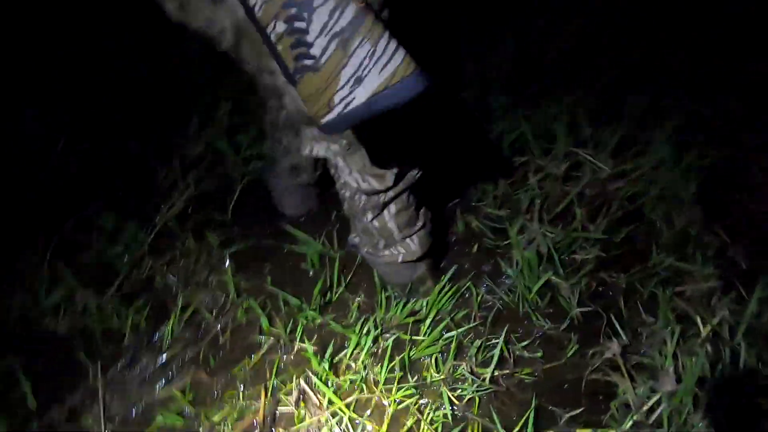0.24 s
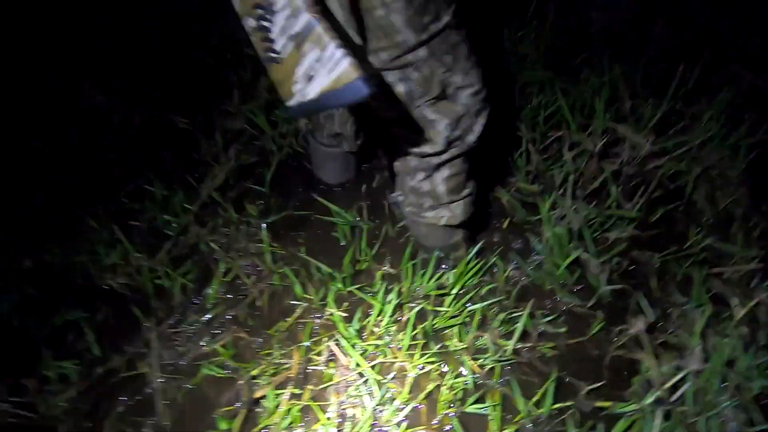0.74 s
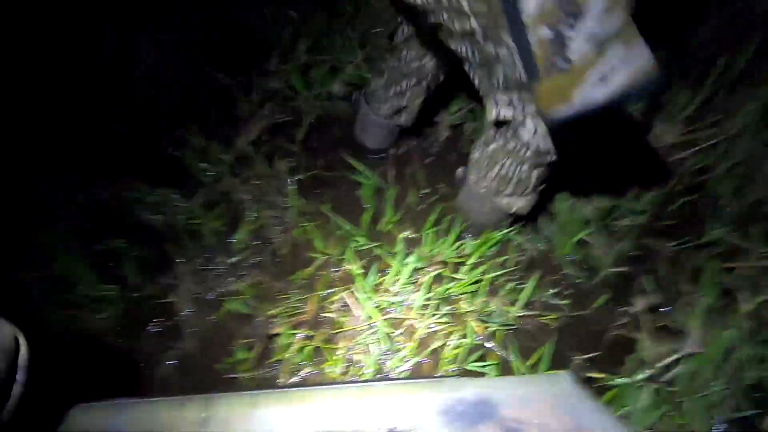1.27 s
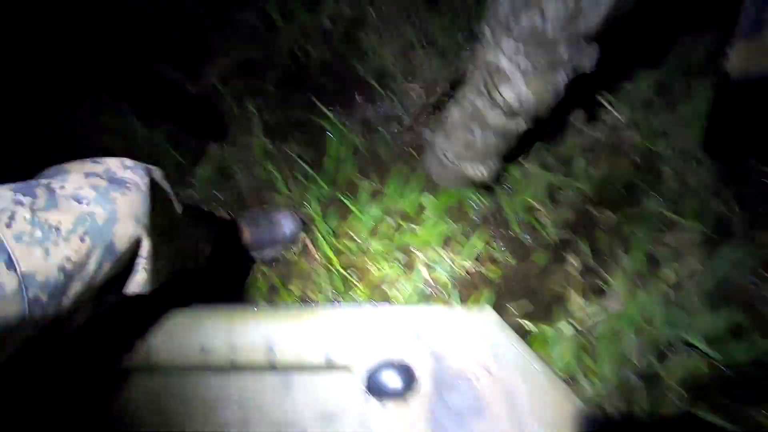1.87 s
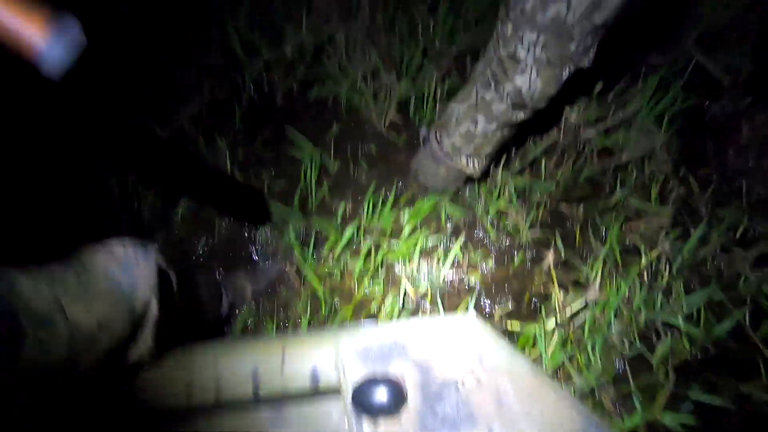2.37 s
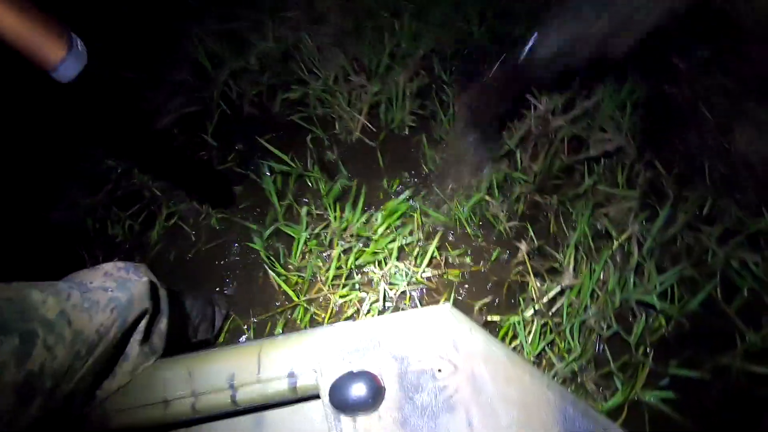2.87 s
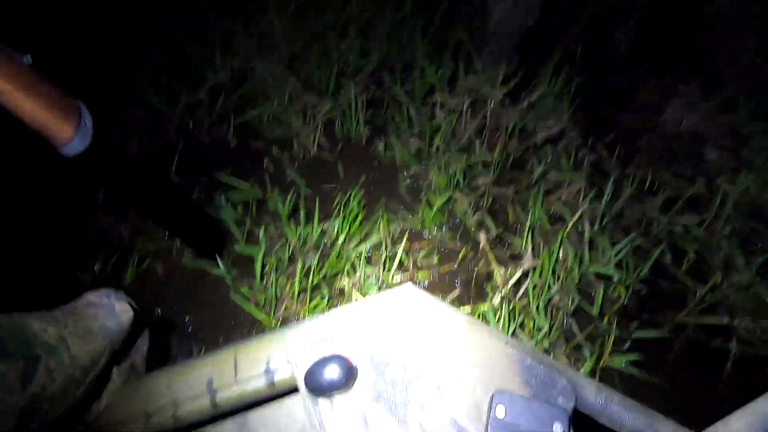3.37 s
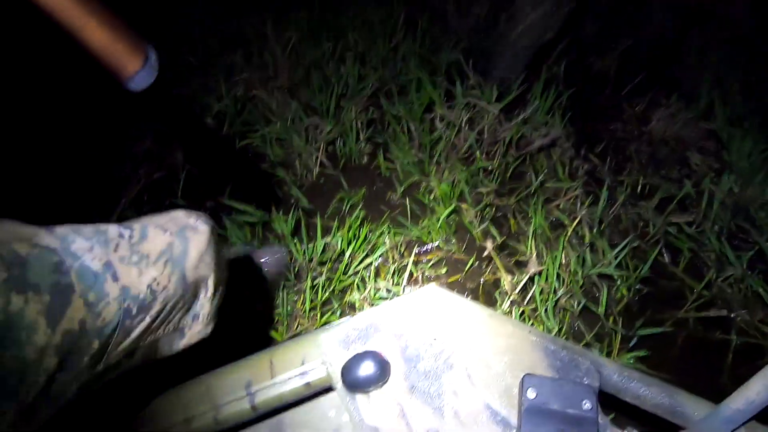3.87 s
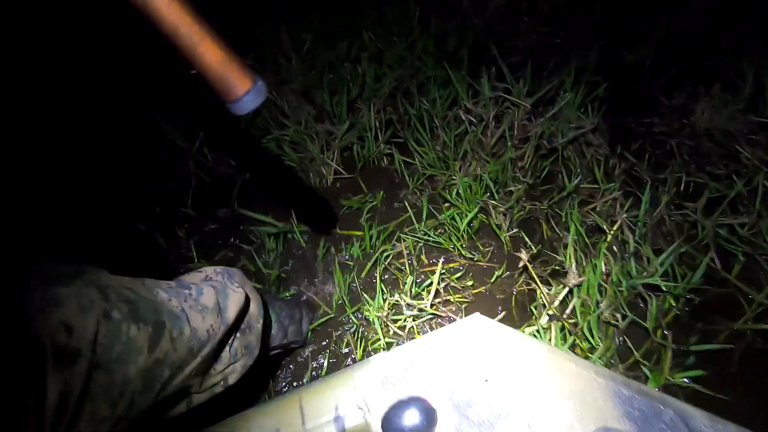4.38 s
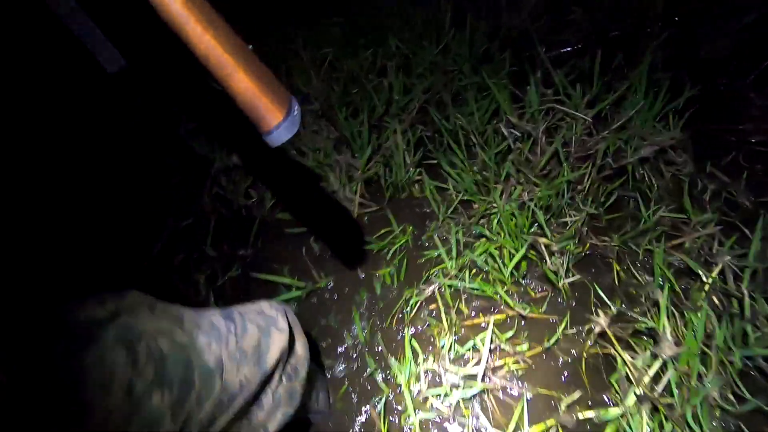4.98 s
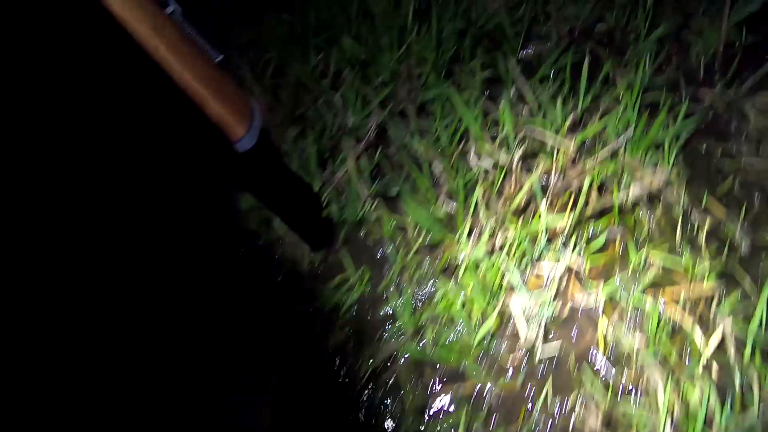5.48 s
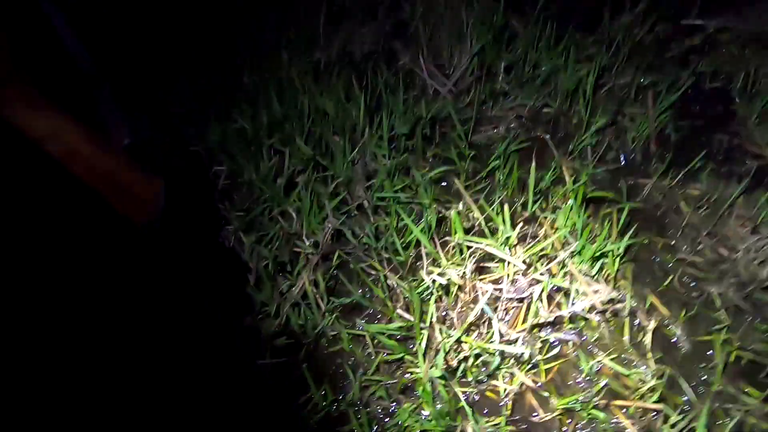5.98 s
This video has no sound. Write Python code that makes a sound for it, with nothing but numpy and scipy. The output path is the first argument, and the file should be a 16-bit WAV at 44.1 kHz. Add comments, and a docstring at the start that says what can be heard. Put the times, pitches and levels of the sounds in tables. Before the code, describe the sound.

A close mono sound of walking in a shallow swamp. Wet blades swish and spray ticks in uneven bursts, with gurgles and tiny rising bubble plops between them. A hollow box carried along bumps dully, rubs on cloth and hums low, mostly in the first second and near the end. Faint rubbery squeaks, lumpy handling rumble and a thin steady hiss; dry open air without echo.

```python
"""Wet grass and shallow water at night: boots wade through, heard by a small microphone carried with a hollow box.
Grass and spray swish as dense trains of tiny rings over hiss; larger bubbles gurgle and single drops crack.
Air pockets plop as sines that rise while they die, and wet rubber squeaks as sliding narrow-band noise.
The box is knocked, dragged and rubbed, so that its damped modes ring low; handling makes a deep, lumpy rumble
of modulated noise, whose louder swells are short low thumps."""
import sys
import numpy as np
from scipy import signal
from scipy.fft import rfft, irfft
from scipy.io import wavfile
from scipy.ndimage import uniform_filter1d

SR = 44100
rng = np.random.default_rng(int(sys.argv[2]) if len(sys.argv) > 2 else 0)


def amplitude_ratio(level_db):
    """Convert a level in decibels to the matching linear amplitude (field) ratio."""
    exponent = np.asarray(level_db, float) / 20
    return 10 ** exponent


def inscribe(sig):
    """Save sig as 16-bit PCM at rate SR to the path in sys.argv[1].

    A 1-D sig is mono; a 2-D sig holds one channel per row.
    Samples are clipped to [-1, 1] before scaling.
    """
    pcm = np.round(np.clip(np.atleast_2d(sig).T, -1, 1) * 32767)
    wavfile.write(sys.argv[1], SR, pcm.astype(np.int16))


N = 274743

# Legs pushing through the grass. Each row: time in seconds, swish level in dB,
# water depth as gurgle in dB above the swish.
STRIDE_LEVELS = [(0.0, -49.5, 1.5), (0.22, -49.5, -9), (0.47, -63, 1.5), (1.27, -67.5, 8.5),
                 (1.45, -54.5, 0.5), (1.62, -45.5, -3), (1.87, -39.5, -7.5), (2.15, -37.5, -9.5),
                 (2.24, -41, 2.5), (2.41, -50, -4), (2.5, -56.5, 7), (2.68, -47.5, -9.5), (2.8, -51, -8),
                 (2.93, -43, -11), (3.1, -46, -12), (3.36, -40, -10), (3.56, -56.5, -9), (3.68, -53.5, 0.5),
                 (3.8, -55.5, 0.5), (4.08, -37.5, -5.5), (4.22, -38, -6), (4.5, -45.5, -3),
                 (4.7, -48, -10.5), (4.8, -51, -8.5), (5.14, -53.5, -8), (5.41, -54, -4), (5.64, -39, -10),
                 (5.74, -45, -7), (5.9, -46, -10.5), (6.0, -46, -9), (6.11, -46.5, -7), (6.23, -48, -3.5)]
# A boot whips a tuft or kicks up spray. Each row: start in seconds, nominal level in dB, decay time constant
# in seconds, brightness as treble in dB above the middle, water depth as gurgle in dB above the swish.
BOOT_SURGES = [(0.0144, -48, 0.018, -4, -7), (0.154, -28.5, 0.024, -8, -18), (0.2478, -31.5, 0.018, -4, 11),
               (0.413, -31, 0.025, -17, 2.5), (0.5546, -55, 0.02, -4, -7), (0.846, -31.5, 0.02, -7, 8),
               (1.1443, -33, 0.012, -8, -15), (1.3119, -39, 0.059, -10, 1.5), (1.3738, -30, 0.017, -10, -4),
               (1.5488, -32, 0.025, 2, -9), (1.707, -22, 0.066, -19, -0.5), (1.8694, -41, 0.02, -4, -10),
               (1.928, -25, 0.018, -10, -9), (1.9614, -21, 0.022, -12, -6), (2.1066, -8, 0.04, -2.5, -13),
               (2.1374, -20, 0.021, 0, -21), (2.178, -26.5, 0.016, -14, 8), (2.2094, -27, 0.034, -9, 2),
               (2.2583, -16, 0.013, 1, -4), (2.2864, -18, 0.04, -1, -20), (2.305, -30, 0.033, -14, -30),
               (2.3695, -15.5, 0.022, -2.5, -13.5), (2.5057, -47, 0.02, -4, -2),
               (2.574, -40, 0.028, -11, 8), (2.6794, -27, 0.023, -19, -32), (2.8065, -24, 0.016, -1, -13),
               (2.8504, -20.5, 0.018, -4, -9), (2.8805, -21, 0.046, -15, -15), (2.898, -27, 0.066, -12, -7),
               (2.9562, -23.5, 0.035, -1, -9), (2.975, -24.5, 0.054, -7, -6), (3.0294, -22, 0.03, -3, -17),
               (3.1173, -28, 0.02, -4, -5), (3.2061, -39, 0.012, -4, -2.5), (3.2705, -47, 0.022, -4, -7),
               (3.314, -23, 0.031, 5.5, -7), (3.374, -16.5, 0.031, -7, -10),
               (3.396, -14.5, 0.023, 0.5, -18), (3.4294, -25.5, 0.039, -17, -10),
               (3.4694, -33.5, 0.044, 0, 10), (3.498, -31, 0.041, 0, 10), (3.5384, -31.5, 0.029, -7, -18),
               (3.77, -17.5, 0.0075, -14, -7), (3.846, -27.5, 0.066, -3, -7),
               (3.929, -32.5, 0.066, -14, 4.5), (4.0023, -43, 0.022, -4, -5), (4.0487, -10, 0.027, -4, -23),
               (4.0734, -16.5, 0.026, -4, -17), (4.0966, -16, 0.041, -3, -14), (4.14, -22, 0.066, 0, -19),
               (4.2494, -45, 0.026, -2, -2), (4.3011, -29, 0.036, -4, 1), (4.349, -14.5, 0.012, -4, -11),
               (4.4179, -36, 0.022, -4, 9), (4.5331, -44, 0.015, -1, -17), (4.571, -48, 0.017, -4, -13),
               (4.6344, -29, 0.066, 4, -35), (4.8494, -30, 0.054, -6, 1.5), (5.035, -31, 0.013, 7, 3),
               (5.0774, -43, 0.019, -4, -12), (5.439, -27.5, 0.038, -4, 1.5),
               (5.472, -25.5, 0.055, -7, -10), (5.5186, -20.5, 0.015, 7, -1), (5.5518, -24, 0.038, -4, 1),
               (5.5894, -31.5, 0.029, 12.5, -3), (5.6594, -28, 0.038, 10, -5), (5.7594, -28, 0.037, -4, 0),
               (5.8177, -25.5, 0.036, 3, -16), (5.8716, -54, 0.019, -4, -9), (5.9394, -50, 0.022, 0, -7),
               (6.0222, -25.5, 0.046, -4, -5), (6.058, -27, 0.05, -12, -8), (6.1689, -25.5, 0.012, -8, -10)]
SURGE_RISE_S, SURGE_GAIN_DB = 0.007, -12.5
FULL_PER_DEPTH, FULL_DB = 0.45, 4  # deeper water fills the low end of the swish: slope in dB per dB, offset
BRIGHT_PER_DB, STROLL_DB = -0.05, -40  # treble tilt in dB per dB of stride level above STROLL_DB
# Spectrum of the swish. Each row: frequency in Hz, relative density in dB per Hz.
SWISH_SPECTRUM = [(410, -32), (700, -8.5), (839, -13.5), (1120, -4), (1690, -1.5), (2140, -2), (2880, -3.5),
                  (3240, -4.5), (3590, -3.5), (3930, -7.5), (4420, -7), (5960, -17), (10500, -18.5),
                  (13500, -29.5), (15600, -49)]
# Spectrum of the gurgle. Each row: frequency in Hz, relative density in dB per Hz.
SLOSH_SPECTRUM = [(250, -38.5), (420, -7), (560, -2), (635, -3.5), (720, -4.5), (1100, -8.5), (1600, -49)]
# Drops of spray and snapping blades. Each row: start in seconds, nominal level in dB, pitch in Hz,
# wide crack and treble snap, both in dB relative to that level before their band filters.
SPRAY_DROPS = [(0.0144, -32, 2260, -12, -17), (0.154, -34, 3210, -4, -26), (0.2478, -33, 1130, -6, -29),
               (0.4155, -31, 1460, -10, -32), (0.8365, -39, 1210, 0, -29),
               (1.3119, -35.5, 2600, -13, -22.5), (1.3738, -42, 2140, -4, -35),
               (1.3867, -32, 2270, -4, -35), (1.4865, -36, 2190, -12, -26), (1.5474, -35, 2620, -11, -24),
               (1.6856, -28, 1300, -7, -33), (1.7055, -23, 1820, -2.5, -33),
               (1.7399, -19.5, 1480, -19, -30), (1.7883, -24, 1440, -4, -32),
               (1.8736, -22.5, 1515, -6, -14), (1.928, -27, 3320, -7, -24), (1.9614, -21, 2600, -12, -39),
               (2.0657, -34, 2780, -4, -24), (2.0857, -25, 2670, 2, -21), (2.1046, -22, 2600, -4, -26),
               (2.2253, -28, 3740, -14, -11), (2.2608, -32.5, 2630, -15, -17),
               (2.2952, -24.5, 2270, 0, -23), (2.3695, -22.5, 2860, -4, -24), (2.5062, -31, 1610, -16, -24),
               (2.574, -29.5, 2760, -15.5, -15), (2.7197, -32, 3440, -16, -24),
               (2.8065, -36, 1940, -8, -27), (2.8205, -29, 2740, -9, -17), (2.8489, -29, 2930, -16, -26),
               (2.8814, -16, 1680, -10, -27), (2.9562, -23.5, 1120, -4, -24), (2.9791, -16, 2490, -7, -26),
               (3.1173, -25.5, 1510, -2, -30), (3.1383, -31, 1320, -4, -24), (3.1612, -28, 1690, -6, -29),
               (3.1752, -21.5, 1550, -8, -20), (3.2061, -24, 3260, -14, -24), (3.236, -32, 2050, -8, -26),
               (3.2705, -32, 1960, -2, -28), (3.3149, -20.5, 3400, 1, -13), (3.3358, -19.5, 3650, -8, -24),
               (3.3657, -37, 1640, -17, -29), (3.3942, -24, 2580, 0, -24), (3.5658, -35, 1410, -2, -24),
               (3.68, -38, 1910, -8, -24), (3.7234, -36, 1360, -8, -24), (3.7359, -33, 1800, 0, -28),
               (3.7723, -24, 1310, -10, -37), (3.8526, -26.5, 1300, -21, -27), (3.8771, -40, 3120, -9, -37),
               (3.9285, -23.5, 2980, -7, -27), (3.9794, -37, 2150, -16, -26), (4.0023, -36, 1950, -16, -27),
               (4.0362, -27, 2260, -11, -37), (4.0507, -17, 3540, -1, -16), (4.0966, -23, 2550, 6, -24),
               (4.141, -33, 3540, -4, -20), (4.3006, -69, 2520, -14, -26), (4.3136, -32, 2030, -12, -32),
               (4.3745, -22, 2030, -16, -36), (4.4169, -29, 2850, 4, -26), (4.4672, -41, 2770, -11, -27),
               (4.5062, -25.5, 1270, -10, -31), (4.5336, -29, 2770, 0, -5), (4.555, -30, 2460, -7, -14),
               (4.571, -26, 2560, -6, -26), (4.6059, -33, 2490, -6, -24), (4.6344, -31, 3360, -3, -24),
               (4.7177, -38, 2200, 6, -22), (4.8294, -33, 1140, -3, -28), (4.8534, -21, 1470, -20, -30),
               (4.8858, -32, 1340, 3, -38), (5.037, -29, 1660, -6, -29), (5.3747, -29.5, 3760, -14, -20),
               (5.4061, -32, 2140, -16, -24), (5.4331, -34, 1820, -14, -24), (5.453, -31, 1520, -10, -26),
               (5.4725, -24.5, 1350, -10, -22), (5.5513, -23, 1610, -8, -24), (5.8177, -36, 2520, -4, -24),
               (5.8316, -25, 2550, -12, -24), (5.8716, -32.5, 2920, 4.5, -3), (6.0222, -28, 1550, -4, -21),
               (6.1684, -36, 1570, -2, -29)]
SPLAT_TONE_DB, SPLAT_T60_S = -4.5, 0.026
# Air pockets closing in the water. Each row: start in seconds, nominal level in dB, first pitch in Hz,
# t60 in seconds, fraction by which the mean pitch since the start has risen at t60.
AIR_POCKETS = [(0.105, -31, 556, 0.045, 0.1), (0.131, -29.5, 643, 0.022, 0.5),
               (0.154, -20, 420, 0.025, 0.6), (0.417, -32.5, 3700, 0.022, 0.02),
               (0.417, -35.5, 456, 0.14, 0.1), (0.555, -42.5, 5370, 0.02, 0.24),
               (1.332, -43, 545, 0.1, 0.07), (1.373, -33, 567, 0.12, 0.6), (1.706, -26.5, 950, 0.059, 0.23),
               (1.762, -30, 634, 0.11, 0), (1.929, -32, 645, 0.05, 0), (2.118, -32, 524, 0.04, 0.13),
               (2.139, -31, 1170, 0.034, 0.1), (2.193, -37, 591, 0.37, 0.18),
               (2.261, -21.5, 412, 0.051, 0.03), (2.295, -25, 457, 0.02, 0.4), (2.404, -28, 520, 0.045, 0),
               (2.506, -28.5, 412, 0.063, 0), (2.955, -22.5, 1126, 0.039, 0.24),
               (2.966, -20, 980, 0.03, 0.05), (2.989, -27, 992, 0.12, 0.6), (3.027, -31.5, 573, 0.048, 0),
               (3.389, -23, 453, 0.048, 0.1), (3.772, -28, 685, 0.036, 0.64),
               (3.844, -29.5, 1035, 0.045, 0.05), (4.023, -22.5, 648, 0.098, 0),
               (4.074, -29, 760, 0.046, 0.05), (4.099, -20, 1130, 0.029, 0.1),
               (4.249, -24.5, 1025, 0.064, 0.03), (4.303, -18, 640, 0.065, 0),
               (4.324, -22.5, 637, 0.056, 0), (4.409, -25, 630, 0.051, 0), (4.468, -32.5, 766, 0.036, 0.14),
               (4.853, -26, 630, 0.025, 0.1), (5.471, -31, 1350, 0.039, 0.1),
               (5.495, -27, 1010, 0.049, 0.05), (5.524, -14, 590, 0.029, 0.08),
               (5.644, -25, 536, 0.059, 0.23), (6.051, -25.5, 566, 0.037, 0)]
# Faint squeaks of wet rubber. Each row: start in seconds, length in seconds, first pitch in Hz,
# last pitch in Hz, level in dB before the ends are tapered.
RUBBER_SQUEAKS = [(1.277, 0.55, 2700, 2727, -59.5), (2.813, 0.024, 1286, 2850, -47),
                  (2.847, 0.022, 1367, 2940, -36), (3.626, 0.17, 2020, 2030, -52),
                  (4.977, 0.041, 880, 2770, -49.5), (5.935, 0.018, 1400, 2320, -47),
                  (5.944, 0.034, 955, 1190, -49)]
SQUEAK_WIDTH_HZ = 140
# Modes of the hollow box, grouped face by face. Each row: frequency in Hz, relative level in dB, t60 in seconds.
BOX_MODES = [
    [(122.9, -11.5, 0.17), (126.8, -27, 0.39)],
    [(165.6, 3, 0.1), (162.7, -1, 0.057), (191.4, -6.5, 0.23)],
    [(223.4, -3.5, 0.28), (242.8, 8, 0.071), (256.5, -7, 0.1), (288.4, 2, 0.13)],
    [(340.5, 2.5, 0.11), (401, -0.5, 0.11), (498, 0, 0.036), (630, -5, 0.052)],
]
# Blows on the box. Each row: time in seconds, nominal level in dB, place struck on the scale of faces 0-3
# (it may lie beyond either end), dB lost one face away, growing with distance squared.
BOX_BLOWS = [(0.175, -25, 3.5, 3.8), (0.247, -16, 2.1, 11), (0.3, -32.5, 2.4, 14), (0.418, -34, 3.5, 4.4),
             (0.528, -39, 2, 7.2), (0.59, -37.5, 2.5, 17), (0.613, -35.5, 1.6, 9), (0.659, -42, 0.4, 14),
             (0.823, -22, 0.5, 11), (0.836, -10.5, 0.8, 5), (0.879, -29, 1.5, 5.6), (1.004, -37, 1.5, 5),
             (1.386, -27.5, 2.2, 4.9), (1.418, -32, 5, 3.2), (1.669, -35.5, 2, 2.5), (1.833, -35.5, .8, 12),
             (1.934, -41, 1.5, 1.8), (2.126, -39, 2.6, 1.7), (2.255, -28, 4, 6), (2.412, -30.5, 4, 11),
             (2.499, -31.5, -1, 11.5), (3.421, -20.5, 0.5, 10), (3.443, -37, 0.5, 3.8),
             (3.469, -34, 0.5, 3.6), (3.49, -33, 2, 3.7), (3.508, -26.5, 3.5, 4.9), (3.527, -29, 3, 6),
             (3.556, -26, 2.7, 3.8), (3.58, -36, 4, 6.4), (3.775, -35.5, 2.5, 2.4), (4.076, -37, 1.5, 15),
             (4.63, -39.5, 2.3, 2.5), (4.712, -39.5, 1, 2.7), (4.803, -31, 0.5, 31), (4.824, -54, -4, 15),
             (5.398, -36, 1.5, 7.8), (5.438, -36, 2, 13), (5.653, -22, 1.75, 6.6), (5.69, -39, 5, 16),
             (5.747, -32, 0.5, 16), (5.798, -12, 2, 11.4), (5.834, -35, 2.3, 1.5), (5.927, -30, 3.5, 5.3),
             (6.107, -34, 3, 5.1), (6.158, -35, 1.3, 4.5)]
SCUFF_DB, SCUFF_RISE_S, SCUFF_FALL_S = -23, 0.015, 0.025  # every blow comes with a scuff of cloth
# One mode of the box sings while it drags along the body. Each row: time of the peak in seconds,
# peak in dB, pitch in Hz, swell time in seconds, t60 in seconds.
BOX_DRAGS = [(0.258, -16, 162.7, 0.0042, 0.16), (0.31, -24.5, 164.5, 0.014, 0.16),
             (0.49, -31.5, 180, 0.0064, 0.079), (0.765, -26.5, 187, 0.0038, 0.065),
             (0.885, -21.5, 133, .015, 0.26), (0.921, -28, 121, .012, 0.087),
             (1.015, -25.5, 174, 0.011, 0.11), (1.04, -23, 128, 0.012, 0.068),
             (1.399, -24.5, 160.3, 0.023, 0.15), (1.679, -26.5, 160.4, 0.0062, 0.1),
             (3.533, -21, 161.6, 0.014, 0.31), (3.565, -19, 162.3, 0.0093, 0.15),
             (3.447, -20, 138, 0.0048, 0.087), (4.81, -28.5, 123, .01, 0.15), (5.41, -36, 292, 0.023, 0.24),
             (5.51, -37.5, 123, 0.04, .2), (5.665, -16.5, 284, 0.0089, 0.051),
             (5.685, -17, 121, 0.013, 0.24), (5.785, -23.5, 121, .03, 0.13),
             (5.806, -23.5, 343, 0.0076, 0.091), (5.844, -31, 240, .008, .15),
             (5.935, -22, 243, 0.018, 0.12)]
# Slow handling. Each row: time in seconds, microphone rumble in dB, box rubbing in dB.
HANDLING_LEVELS = [(0.0, -44, -35.5), (0.29, -43, -51), (0.62, -49, -45.5), (0.9, -40, -44),
                   (1.07, -36, -55), (1.21, -52, -53.5), (1.37, -62, -49), (1.61, -59, -38.5),
                   (1.79, -37, -49), (2.19, -52, -48), (2.71, -42, -47), (3.12, -55, -53),
                   (3.26, -41.5, -55.5), (3.4, -39, -38), (3.52, -43, -43), (3.83, -61, -52.5),
                   (4.15, -61, -52), (4.29, -43, -46.5), (4.42, -51, -56), (4.67, -48, -54),
                   (4.82, -41, -42.5), (5.27, -53.5, -47), (5.6, -39, -40.5), (5.79, -36.5, -33.5),
                   (5.97, -47, -36.5), (6.23, -38, -41)]
# Spectrum of the rumble. Each row: frequency in Hz, relative density in dB per Hz.
RUMBLE_SPECTRUM = [(10, -3.5), (25, 7.5), (45, -5), (65, -2.5), (90, -9.5), (140, -33)]
# Louder swells of the low handling rumble, as short low thumps. Each row: start in seconds,
# nominal level in dB, pitch in Hz.
RUMBLE_THUMPS = [(0.033, -44, 58.4), (0.101, -39, 48.5), (0.206, -37, 33), (0.405, -57, 43.3),
                 (0.612, -37.5, 78), (0.666, -45, 98), (0.679, -35.5, 47.7), (0.815, -37, 76),
                 (0.995, -32, 76), (1.261, -40, 71), (1.35, -38, 69), (1.611, -35.5, 81),
                 (1.649, -39, 43.4), (1.751, -34, 45), (1.825, -41, 58.3), (2.222, -46, 33),
                 (2.477, -33, 34.3), (2.682, -43, 57.4), (2.774, -37.5, 44.7), (2.856, -39.5, 71),
                 (2.984, -38.5, 44.4), (3.276, -35, 34.4), (3.401, -33.5, 96), (3.727, -41, 40.4),
                 (3.856, -42, 65.5), (4.18, -43, 32), (4.257, -37, 39), (4.654, -34, 68.5),
                 (4.75, -34.5, 58.4), (5.024, -49.5, 43), (5.214, -39.5, 70), (5.31, -38.5, 49.4),
                 (5.535, -40, 96.5), (5.569, -31.5, 92), (5.746, -33, 101), (5.985, -36.5, 48),
                 (6.158, -32.5, 63)]
THUMP_CYCLES = 1.68  # decay constant in cycles
# Spectrum of the night hiss. Each row: frequency in Hz, relative density in dB per Hz.
NIGHT_SPECTRUM = [(180, -10), (300, -4), (366, -11.5), (610, -8), (1020, -12), (1280, -7), (4360, -8),
                  (6270, -25), (10800, -32), (15600, -66)]
NIGHT_DB = -57.5
# Small resonances of the microphone housing. Each row: frequency in Hz, width in Hz, gain in dB.
HOUSING_RESONANCES = [(665, 125, 0.5), (1660, 120, -0.5), (2020, 130, -1), (2940, 560, 2), (3540, 76, -1.5),
                      (4460, 130, 0), (5540, 480, 2), (8220, 470, 4), (10900, 470, 0)]
EDGE_HZ = 15400  # upper band limit


def evened(x):
    """Normalization: scales a signal to rms 1."""
    return x / np.sqrt(np.mean(x ** 2) + 1e-20)


def curve(rows, column):
    """Linear interpolation: one column of a table at every sample."""
    rows = np.array(rows)
    return np.interp(np.arange(N) / SR, rows[:, 0], rows[:, column])


def coloured(x, points):
    """Minimum-phase filtering: a causal response shapes the spectrum and keeps clicks sharp in front."""
    hz = np.abs(np.fft.fftfreq(8192, 1 / SR))
    f, db = np.transpose(points)
    gain_db = np.interp(np.log(hz + 1), np.log(f + 1), db, -90, -100)
    log_gain = np.log(amplitude_ratio(gain_db))
    # the Hilbert transform of the log gain gives the minimum phase
    taps = np.fft.ifft(np.exp(np.conj(signal.hilbert(log_gain)))).real[:4096]
    return evened(signal.oaconvolve(x, taps)[:len(x)])


def add(mix, s, sound):
    """Superposition: adds a sound to the mix from a time in seconds."""
    part = mix[round(s * SR):][:len(sound)]
    part += sound[:len(part)]


def lumps(per_s, depth_db):
    """Random modulation: smoothed noise moves a gain in dB, about per_s times a second."""
    size = max(int(SR / per_s), 2)
    smooth = uniform_filter1d(uniform_filter1d(rng.standard_normal(N), size), size)
    return amplitude_ratio(depth_db * evened(smooth))


def swells(times, heights, rise_s, falls_s):
    """Exponential attack and decay: sums one envelope per event; heights is (events, layers)."""
    out = np.zeros((np.shape(heights)[1], N))
    for s, height, fall_s in zip(times, heights, falls_s):
        t = np.arange(int(min(8 * fall_s, 1) * SR)) / SR
        for layer, h in zip(out, height):
            add(layer, s, h * (1 - np.exp(-t / rise_s)) * np.exp(-t / fall_s))
    return out


def droplets(low_hz, high_hz, cycles, per_s, spread_db, rise, count=24):
    """Granular texture: sparse random trains of damped rings that rise in pitch; a few are large."""
    kind = rng.integers(0, count, N)
    size = amplitude_ratio(spread_db * np.minimum(rng.exponential(1, N), 4))
    size = size * (rng.random(N) < per_s / SR) * rng.choice([-1, 1], N)
    out = np.zeros(N)
    for k, hz in enumerate(np.geomspace(low_hz, high_hz, count)):
        u = np.arange(int(4 * cycles * SR / hz)) * hz / SR  # time in cycles
        tone = np.sin(2 * np.pi * u * (1 + rise * u / cycles))
        grain = tone * np.exp(-u / cycles) * (1 - np.exp(-u / 0.05))
        out += signal.oaconvolve(size * (kind == k), grain * np.sqrt(hz) / np.linalg.norm(grain))[:N]
    return evened(out)


def wading():
    """Power addition of stride and surges: gains of the swish (middle, top, low end) and of the gurgle."""
    def layers(db, bright_db, depth_db):
        """Level offsets: splits one level into the four gains."""
        return amplitude_ratio([db, db + bright_db, db + FULL_DB + FULL_PER_DEPTH * depth_db, db + depth_db])
    s, db, fall_s, bright_db, depth_db = np.transpose(BOOT_SURGES)
    heights = layers(db + SURGE_GAIN_DB, bright_db, depth_db).T
    surges = swells(s, heights, SURGE_RISE_S, fall_s)
    stride_db = curve(STRIDE_LEVELS, 1)
    stride_bright_db = BRIGHT_PER_DB * (stride_db - STROLL_DB)  # a louder stride is slightly duller
    return np.hypot(layers(stride_db, stride_bright_db, curve(STRIDE_LEVELS, 2)), surges)


def swish():
    """Superposed impacts: wet blades whip the boots and spray falls as clumped crackle and drips over hiss."""
    hiss = rng.standard_normal(N)
    crackle = droplets(815, 14300, cycles=0.59, per_s=3000, spread_db=1.2, rise=0.018)
    drips = droplets(894.4, 7040, cycles=8.5, per_s=2800, spread_db=3.5, rise=0.033, count=40)
    clumps = lumps(30, 0.5) * lumps(140, 1.9)
    water = 0.5 * hiss + 0.33 * crackle + 0.43 * drips
    sound = coloured(water * clumps, SWISH_SPECTRUM)
    # zero-phase filters split three bands, each with its own gain
    top = signal.sosfiltfilt(signal.butter(3, 5800, "high", fs=SR, output="sos"), sound)
    low = signal.sosfiltfilt(signal.butter(2, 1700, "low", fs=SR, output="sos"), sound)
    middle_gain, top_gain, low_gain, _ = wading()
    return middle_gain * (sound - top - low) + top_gain * top + low_gain * low


def slosh():
    """Bubble resonance: water pushed aside gurgles diffusely with larger, lower bubbles."""
    bubbles = droplets(377.4, 1153, cycles=4.2, per_s=500, spread_db=2.0, rise=0.03, count=16)
    clumps = lumps(30, 1.8)
    gurgle = coloured((bubbles + 0.13 * rng.standard_normal(N)) * clumps, SLOSH_SPECTRUM)
    return wading()[-1] * gurgle


def splats():
    """Impact and resonance: each drop rings briefly with a sharp wide crack and a treble snap."""
    out, noise = np.zeros(N), rng.standard_normal((len(SPRAY_DROPS), 2, 2000))
    t = np.arange(2000) / SR
    wide = signal.butter(2, [1100, 4800], "band", fs=SR, output="sos")
    treble = signal.butter(2, [6000, 12500], "band", fs=SR, output="sos")
    for (s, db, hz, crack_db, snap_db), (a, b) in zip(SPRAY_DROPS, noise):
        tone = np.sin(2 * np.pi * hz * t) * amplitude_ratio(-60 * t / SPLAT_T60_S) * (1 - np.exp(-t / 0.00035))
        crack = signal.sosfilt(wide, np.sign(a) * np.exp(-t / 0.0018))
        snap = signal.sosfilt(treble, np.sign(b) * np.exp(-t / 0.00057))
        add(out, s, amplitude_ratio(db) * (amplitude_ratio(SPLAT_TONE_DB) * tone + amplitude_ratio(crack_db) * crack + amplitude_ratio(snap_db) * snap))
    return out


def plops():
    """Bubble resonance: a closing air pocket rings as a sine whose pitch, where set, rises while it dies."""
    out, t = np.zeros(N), np.arange(6000) / SR
    for s, db, hz, t60, rise in AIR_POCKETS:
        tone = np.sin(2 * np.pi * hz * t * (1 + rise * t / t60))
        attack = 1 - np.exp(-t / 0.00019)
        add(out, s, 0.74 * amplitude_ratio(db - 60 * t / t60) * attack * tone)
    return out


def squeaks():
    """Narrow-band noise: slow noise modulates a carrier that slides in pitch, so the tone wavers."""
    out = np.zeros(N)
    for s, length, first_hz, last_hz, db in RUBBER_SQUEAKS:
        size = int(length * SR)
        a, b = uniform_filter1d(rng.standard_normal((2, SR))[:, :size], int(SR / SQUEAK_WIDTH_HZ / 2), 1)
        carrier = np.exp(2j * np.pi * np.cumsum(np.geomspace(first_hz, last_hz, size)) / SR)
        tone = evened((carrier * (a + 1j * b)).real)
        add(out, s, amplitude_ratio(db) * tone * signal.windows.tukey(size, 0.6))
    return out


def ring(hz, db, t60, lead=0., turn=0.):
    """Damped mode: a cosine lagging by turn cycles, steady for lead seconds and then decaying."""
    t = np.arange(SR // 2) / SR - lead
    return amplitude_ratio(db - 60 * np.maximum(t, 0) / t60) * np.cos(2 * np.pi * (hz * t - turn))


def knocks():
    """Modal excitation: a soft blow swells and dies; faces farther from it ring less, with a phase per face."""
    out, t, lead = np.zeros(N), np.arange(SR // 2) / SR, 0.03
    number = np.arange(len(BOX_MODES))
    contact_s = 0.012 * 0.96 ** number[:, None]  # higher faces answer faster
    swell = np.exp(-(np.maximum(lead - t, 0) / contact_s) ** 2) * np.minimum(t / 0.006, 1) ** 2
    faces = np.array([sum(ring(*mode, lead, 0.22 * k) for mode in face) for k, face in enumerate(BOX_MODES)])
    faces *= swell
    faces /= np.abs(faces).max(1, keepdims=True)
    for s, db, place, db_per_face in BOX_BLOWS:
        face_db = db + 2.0 - db_per_face * (number - place) ** 2
        add(out, s + 0.00841 - lead, amplitude_ratio(face_db) @ faces)
    return out


def drags():
    """Single-mode resonance: one tone swells softly as the box drags and then rings out."""
    out, lead = np.zeros(N), 0.1
    t = np.arange(SR // 2) / SR - lead
    for s, db, hz, swell_s, t60 in BOX_DRAGS:
        swell = np.exp(-(np.minimum(t, 0) / swell_s) ** 2)
        add(out, s - lead, ring(hz, db, t60, lead) * swell)
    return out


def rubbing():
    """Noise excitation of modes: cloth rubs the box, with an extra scuff around each blow."""
    body = sum(amplitude_ratio(-3.5 * k) * ring(*mode, 0, 1 / 4) for k, face in enumerate(BOX_MODES) for mode in face)
    soft = signal.butter(2, 900, "low", fs=SR, output="sos")
    friction = signal.sosfilt(soft, rng.standard_normal(N)) * lumps(35, 3.)
    rub = evened(signal.oaconvolve(friction, body)[:N])
    s, db = np.transpose(BOX_BLOWS)[:2]
    scuffs = swells(s - SCUFF_RISE_S, amplitude_ratio(db + SCUFF_DB)[:, None], SCUFF_RISE_S, SCUFF_FALL_S + 0 * s)[0]
    return np.hypot(amplitude_ratio(curve(HANDLING_LEVELS, 2)), scuffs) * rub


def rumble_thumps():
    """Damped oscillation: the louder swells of the handling rumble are short low thumps of a few cycles."""
    out = np.zeros(N)
    for s, db, hz in RUMBLE_THUMPS:
        u = np.arange(int(6 * SR / hz)) * hz / SR  # time in cycles
        envelope = np.exp(-u / THUMP_CYCLES) * (1 - np.exp(-u / 0.61))
        add(out, s, amplitude_ratio(db) * 2.86 * np.sin(2 * np.pi * u) * envelope)
    return out


def rumble():
    """Modulated low-frequency noise: handling of the microphone rumbles in lumps."""
    uneven = rng.standard_normal(N) * lumps(18, 0.6) * lumps(18, 1.1)
    return amplitude_ratio(curve(HANDLING_LEVELS, 1)) * coloured(uneven, RUMBLE_SPECTRUM)


def night():
    """Stationary noise: the faint, steady hiss of the night."""
    return amplitude_ratio(NIGHT_DB) * coloured(rng.standard_normal(N), NIGHT_SPECTRUM)


def scene():
    """Superposition: all sources over the hiss of the night, as one channel."""
    water = swish() + slosh() + splats() + plops() + squeaks()
    box = knocks() + drags() + rubbing()
    return (water + box + rumble_thumps() + rumble() + night())[None]


def band_limit(x):
    """A steep low-pass at the top of the band."""
    return signal.sosfilt(signal.butter(12, 15710, fs=SR, output="sos"), x)


def record(dry):
    """Linear filtering: resonances of the housing colour the sound under a steep upper band limit."""
    hz = np.fft.rfftfreq(N, 1 / SR)
    colour_db = sum(db / (1 + (2 * (hz - f) / width) ** 2) for f, width, db in HOUSING_RESONANCES)
    colour = amplitude_ratio(colour_db) / np.sqrt(1 + (hz / EDGE_HZ) ** 60)
    mix = irfft(rfft(dry) * colour, N)
    return band_limit(mix)


dry = scene()
out = record(dry)
inscribe(out)
```